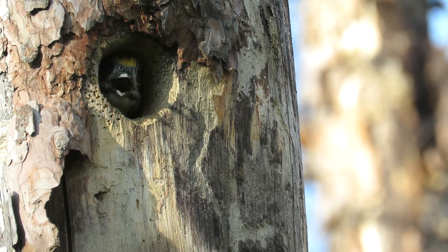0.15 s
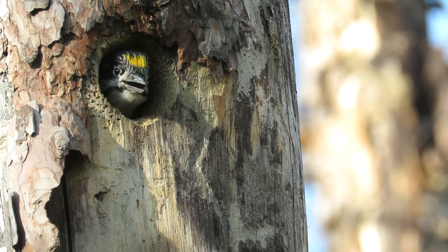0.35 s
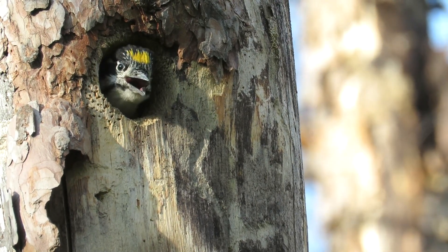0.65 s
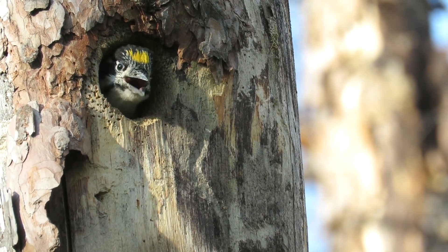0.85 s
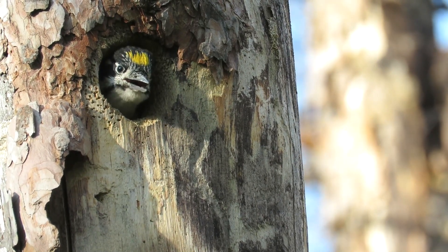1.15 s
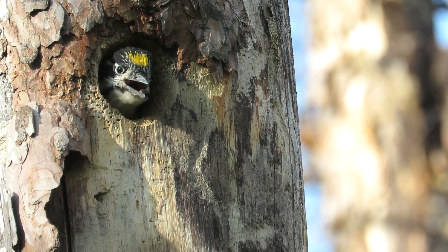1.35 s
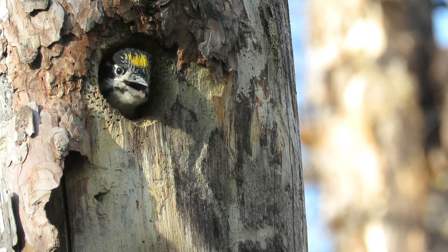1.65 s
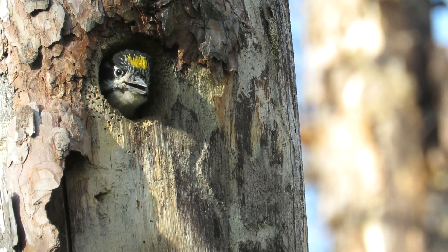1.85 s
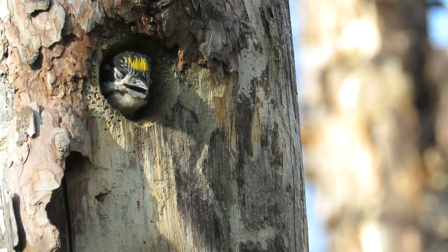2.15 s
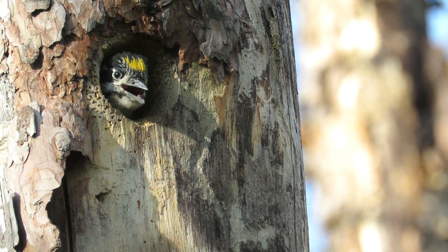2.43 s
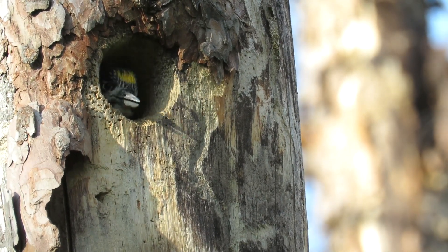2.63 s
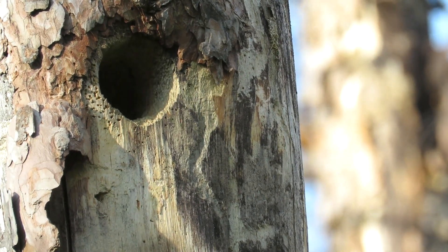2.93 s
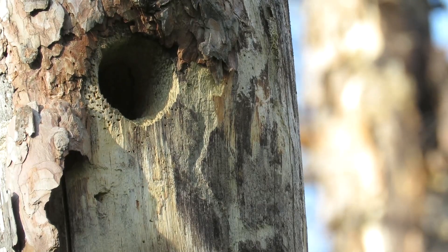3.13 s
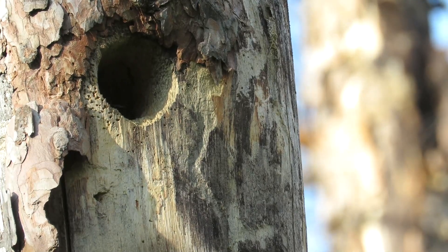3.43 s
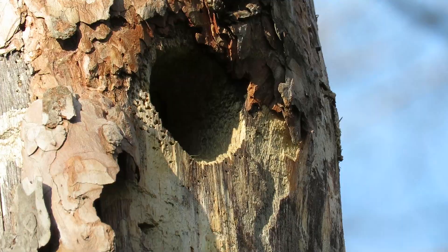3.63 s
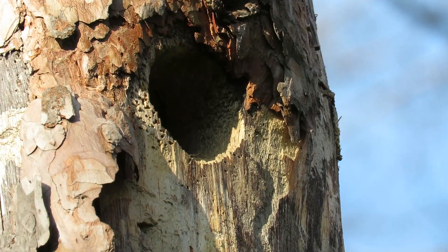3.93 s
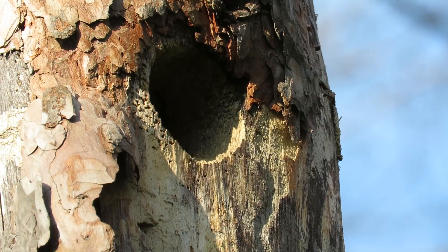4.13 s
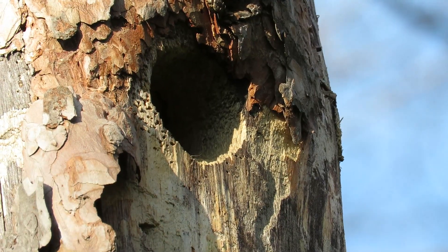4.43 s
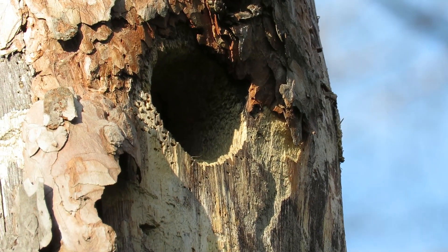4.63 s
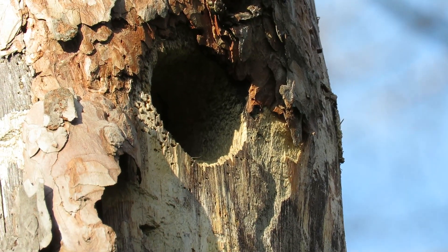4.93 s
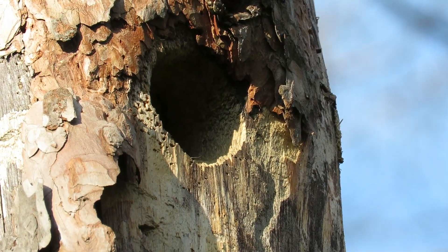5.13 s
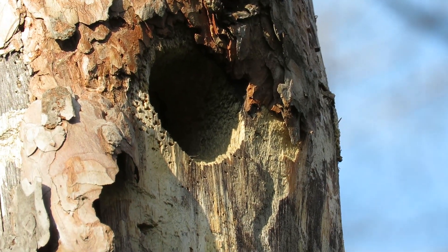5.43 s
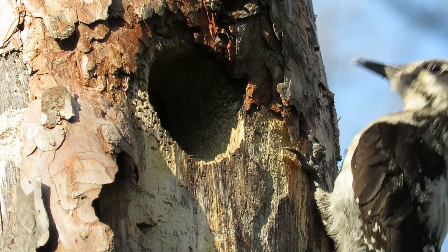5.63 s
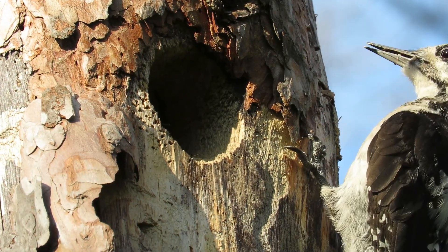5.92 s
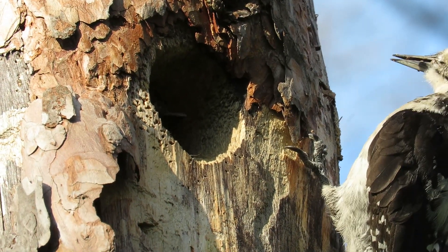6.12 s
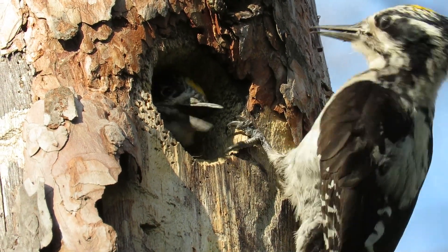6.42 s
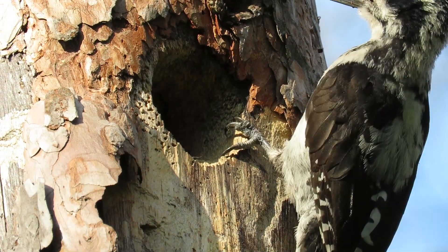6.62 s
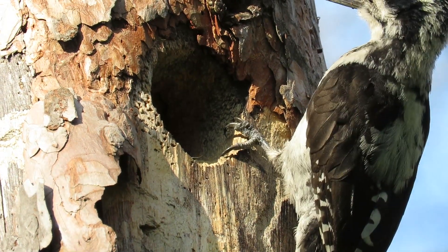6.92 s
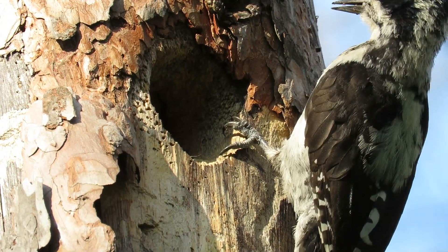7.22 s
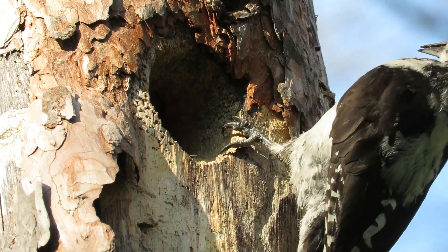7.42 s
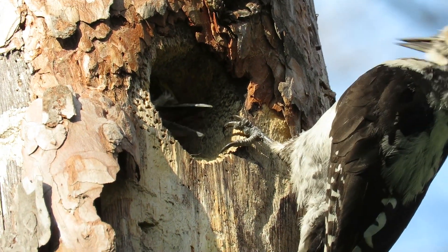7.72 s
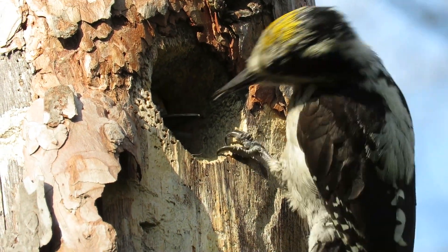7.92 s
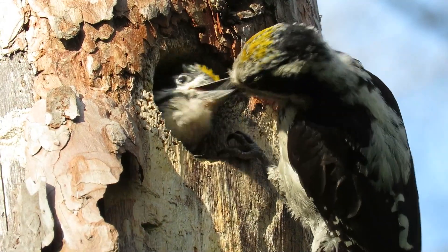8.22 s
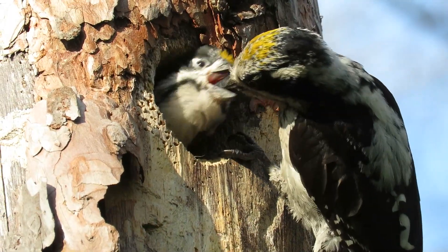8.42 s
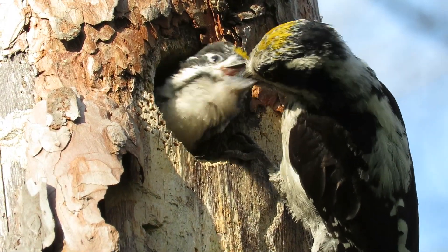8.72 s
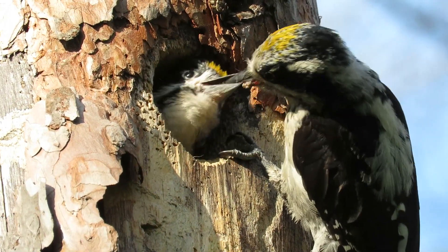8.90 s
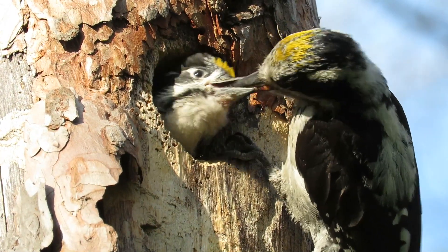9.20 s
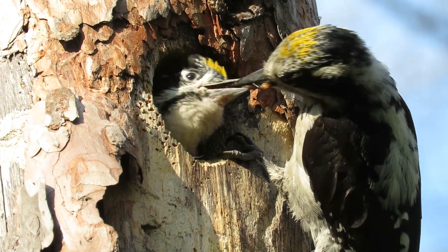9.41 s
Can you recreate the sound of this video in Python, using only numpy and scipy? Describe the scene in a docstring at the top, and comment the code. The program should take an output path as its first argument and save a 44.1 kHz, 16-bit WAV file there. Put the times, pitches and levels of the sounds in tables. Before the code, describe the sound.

Close and central, a woodpecker nestling begs from a tree hole with short, sharp chirps about eight or nine a second. A low breeze rumbles at first. The calls drop softer and hollow as it sinks inside and a distant songbird repeats a falling slur. After a brief gap it cries louder and rougher, with beak clicks and faint sibling squeaks, over quiet forest rush.

```python
"""Woodpecker nestlings begging

Nestlings beg from a hole in a dead tree: one chick calls at the opening, sinks into the cavity, then
cries harder when a parent lands, each cry led by a beak snap. A sibling squeaks from deeper inside.
Voices are sums of harmonics and half-pitch lines under moving spectra; far songbirds are gliding sines.
Breeze, forest rush and hiss are filtered noise; delayed and decaying echoes give hollow, trunk and trees."""
import sys
import numpy as np
from scipy import signal
from scipy.fft import rfft, irfft
from scipy.io import wavfile

SR = 44100
rng = np.random.default_rng(int(sys.argv[2]) if len(sys.argv) > 2 else 0)


def transcribe(u):
    """Save the signal u as a 16-bit wav file named by the first command-line argument.

    u: samples, shape (n,) or (channels, n), limited to [-1, 1]; the rate is SR.
    q: integer samples, one column per channel.
    """
    v = np.clip(np.atleast_2d(u).T, -1, 1)
    q = np.round(v * 32767).astype(np.int16)
    wavfile.write(sys.argv[1], SR, q)


N = 421596

# calls of the nearest chick: t/s, length/s, top pitch f/Hz, level/dB
CHICK_CALLS = [(.005, .05, 2337, -25), (0.133, 0.049, 2350, -25.5), (0.26, 0.048, 2330, -26),
               (.383, .043, 2332, -25.5), (.504, 0.041, 2276, -26.5), (.625, 0.044, 2318, -27.5),
               (.744, 0.048, 2328, -29), (0.858, .048, 2310, -28.5), (.979, 0.04, 2350, -28.5),
               (1.094, 0.044, 2323, -27), (1.208, 0.049, 2330, -28), (1.332, 0.039, 2346, -28),
               (1.444, .04, 2310, -27), (1.562, .039, 2302, -28), (1.675, 0.038, 2300, -28),
               (1.786, 0.04, 2253, -28.5), (1.901, 0.034, 2246, -27.5), (2.012, 0.035, 2237, -27.5),
               (2.122, .037, 2255, -28.5), (2.233, 0.032, 2318, -27.5), (2.342, 0.04, 2335, -27.5),
               (2.452, .03, 2407, -29.5), (2.567, .037, 2350, -27.5), (2.674, 0.029, 2350, -31.5),
               (2.791, 0.034, 2333, -30), (2.899, 0.035, 2395, -29), (3.008, .032, 2556, -27.5),
               (3.108, 0.043, 2506, -29.5), (3.223, 0.029, 2540, -29), (3.329, .04, 2595, -25.5),
               (3.443, .039, 2600, -26), (3.565, 0.043, 2532, -28), (3.708, 0.034, 2330, -32.5),
               (3.824, 0.035, 2280, -34.5), (3.946, 0.035, 2294, -32), (4.061, 0.034, 2240, -33),
               (4.181, 0.034, 2240, -33.5), (4.301, 0.037, 2277, -34), (4.42, 0.035, 2237, -33.5),
               (4.539, 0.035, 2310, -32.5), (4.65, 0.033, 2330, -32), (4.758, .036, 2334, -33.5),
               (4.862, 0.041, 2346, -34.5), (4.971, 0.032, 2343, -31.5), (5.076, 0.032, 2357, -31.5),
               (5.187, .034, 2355, -32), (5.299, 0.033, 2360, -32), (5.414, 0.033, 2306, -33),
               (5.534, 0.038, 2250, -36), (5.858, .053, 2672, -30), (5.969, .048, 2598, -25),
               (6.084, 0.045, 2547, -25), (6.201, .054, 2493, -24.5), (6.326, .048, 2457, -26),
               (6.448, .047, 2455, -25.5), (6.566, .036, 2435, -28.5), (6.689, 0.045, 2240, -39),
               (6.809, 0.045, 2430, -33.5), (6.931, 0.046, 2326, -29.5), (7.057, .045, 2500, -27),
               (7.18, 0.044, 2480, -27.5), (7.305, .045, 2533, -27.5), (7.432, 0.046, 2530, -27),
               (7.564, 0.051, 2498, -28), (7.708, 0.049, 2315, -29.5), (7.847, .047, 2337, -28.5),
               (7.985, .059, 2402, -28.5), (8.145, 0.05, 2478, -28.5), (8.302, .047, 2378, -32),
               (8.5, 0.055, 2287, -29), (8.694, 0.05, 2390, -29), (8.908, .05, 2577, -31),
               (9.102, 0.046, 2480, -28.5), (9.272, .046, 2503, -29), (9.434, 0.052, 2502, -30)]
# effort through a steady begging call: t/(call length), level/dB
STEADY_PUSH = [(0, 0.5), (.08, 2), (.4, 5.5), (.7, 1), (.9, -8), (1.05, -7)]
SINKS_S, PARENT_LANDS_S = 3.65, 5.7


def amp(db):
    """Logarithmic level: 20 dB is a tenfold amplitude."""
    return 10 ** (np.asarray(db) / 20)


def evened(x):
    """Normalisation by power: scales to an rms of 1."""
    return x / np.sqrt(np.mean(x ** 2) + 1e-20)


def read(points, hz):
    """Interpolation of a spectrum on a logarithmic frequency axis."""
    f, value = np.transpose(points)
    return np.interp(np.log(hz + 1), np.log(f + 1), value)


def at(curve, s):
    """Linear interpolation of every column of a control curve at time s."""
    times, *columns = np.transpose(curve)
    return [np.interp(s, times, column) for column in columns]


def add(mix, s, sound):
    """Superposition: lays a sound into the mix at time s."""
    part = mix[max(round(s * SR), 0):][:len(sound)]
    part += sound[:len(part)]


def noise(colour, size):
    """Spectral shaping: white noise weighted by a spectrum, at an rms of 1."""
    spectrum = rfft(rng.standard_normal(size))
    hz = np.fft.rfftfreq(size, 1 / SR)
    return evened(irfft(spectrum * amp(read(colour, hz)), size))


def waver(rate_hz, size):
    """Low-pass filtered noise: smooth random motion, mostly below a given rate."""
    hz = np.fft.rfftfreq(16384, 1 / SR)
    spectrum = rfft(rng.standard_normal(2 * len(hz) - 2))
    return evened(irfft(spectrum / (1 + (hz / rate_hz) ** 4)))[:size]


def forest():
    """Partial coherence: a diffuse rush and hiss differing between the ears, with a thin steady whine."""
    # rush and hiss of the woods: f/Hz, level/dB
    rush_colour = [(15, -20), (60, -1), (130, -4.5), (300, -3), (600, -6.5), (1000, -10), (1500, -16),
                   (2500, -20.5), (4000, -23), (7000, -28.5), (15000, -32.5), (16000, -21.5)]
    # strength of the rush: t/s, level/dB
    rush_db = [(0, -40.5), (3.6, -41.5), (3.8, -42.5), (5.7, -43), (8, -42.5), (9.5, -41.5)]
    # left-right likeness: f/Hz, correlation/1
    likeness = [(30, 1), (120, 1), (300, 0.99), (700, 0.97), (2000, 0.99), (6000, 1), (10000, 0.54),
                (15000, 0.27)]
    whine_hz, whine_db = 15105, -71
    t = np.arange(N) / SR
    a, b = rfft(noise(rush_colour, size=N)), rfft(noise(rush_colour, size=N))
    same = np.clip(read(likeness, np.fft.rfftfreq(N, 1 / SR)), -1, 1)
    mid = irfft(a * np.sqrt((1 + same) / 2), N)
    side = irfft(b * np.sqrt((1 - same) / 2), N)
    whine = amp(whine_db) * evened(np.sin(2 * np.pi * whine_hz * t))
    level = amp(np.interp(t, *np.transpose(rush_db)))
    return level * np.array([mid + side, mid - side]) + whine


def wind():
    """Turbulent pressure on the microphone: low noise in random gusts, gone after 3.71 s."""
    # strength of the breeze before gusts and gain: t/s, level/dB
    breeze_db = [(0.0, -44), (0.42, -50.5), (0.52, -36), (0.96, -45.5), (1.1, -32), (2.32, -30.5),
                 (2.47, -41), (3.54, -36.5), (3.67, -42), (3.7, -54)]
    # spectrum of the turbulence: f/Hz, level/dB
    breeze_colour = [(10, -7.5), (32, -4.5), (60, -5.5), (95, -14), (150, -22.5), (300, -42), (900, -64)]
    gusts_hz, gusts_db, gain_db = 4.7, 1, 0.5
    t = np.arange(N) / SR
    spectrum = rfft(rng.standard_normal(N))
    gusts = evened(irfft(spectrum / (1 + (np.fft.rfftfreq(N, 1 / SR) / gusts_hz) ** 4), N))
    db = at(breeze_db, t)[0] + gain_db + gusts_db * gusts
    fade = np.interp(t, [3.66, 3.71], [1, 0])
    return noise(breeze_colour, size=N) * amp(db) * fade


def hiss():
    """Turbulent flow noise: air rushes through the chick's throat as each call is about to catch."""
    # hiss of begging, then of the cries for food: f/Hz, level/dB
    chatter_colour = [(800, -35), (1800, -11), (2500, -1), (3800, -9), (5000, -3), (6000, -15), (7200, -24),
                      (15000, -30)]
    cry_colour = [(800, -22), (2000, 0), (3300, 0), (4800, -8), (5500, -3), (6100, 6), (6900, -21),
                  (9000, -21), (15000, -15)]
    hiss_s, below_call_db = 0.014, -15
    out, swell = np.zeros(N), signal.windows.tukey(int(hiss_s * SR), .5)
    for s, _, _, db in CHICK_CALLS:
        colour = chatter_colour if s < PARENT_LANDS_S else cry_colour
        air = swell * noise(colour, size=4096)[:len(swell)]
        add(out, s - 0.54 * hiss_s, amp(db + below_call_db) * air)
    return out


def cry(length, top_hz, rise, crest, colour, push, tilt=0, beak_hz=6000, beak_db=0, hoarse_db=-40, bite_db=0):
    """Source and filter: the syrinx tightens, holds, then slackens roughly; throat and beak colour it."""
    # strength of the lines between the harmonics: f/Hz, level/dB
    half_lines = [(1200, -5.5), (3500, -0.5), (5900, 5), (8300, 4.5), (14000, -4)]
    # the treble blooms just after the onset and dulls again as the call slackens
    bloom_s, onset_dull_db_per_octave, slack_dull_db_per_octave = 0.0028, 3.5, 2.5
    # a brief ring of the throat as the call starts
    bite_hz, bite_width_hz, bite_at_s, bite_s = 6100, 380, 0.0017, .002
    overtone_spread_db = 0.85  # no two calls have quite the same balance of overtones
    t = np.arange(int(1.07 * length * SR)) / SR
    u, crest = t / length, np.clip(crest, .03, .8)

    opening = rise * np.maximum(1 - u / crest, 0) ** 2
    closing = .48 * np.maximum((u - crest) / (1 - crest), 0) ** 2.6
    arch = 1 - opening - closing
    scoop = 1 - 0.344 * np.exp(-t / 0.00105)  # the pitch snaps up as the membranes close
    # the voice is unsteady as it starts and as it lets go
    slack = np.minimum(u, 1) ** 10 + np.exp(-t / .0018)
    jitter = (.003 + .014 * slack) * waver(1100, len(t)) + .005 * waver(70, len(t))
    hz = top_hz * np.maximum(arch, .5) * scoop * (1 + jitter)
    phase = 2 * np.pi * np.cumsum(hz) / SR
    k = np.arange(1, 21)[:, None] / 2  # harmonics and the half-pitch lines between them
    f = k * hz

    tilt = tilt - onset_dull_db_per_octave * np.exp(-t / bloom_s) - slack_dull_db_per_octave * u ** 4
    resonance = beak_db * np.exp(-.5 * ((f - beak_hz) / 600) ** 2)
    bite = np.exp(-((t - bite_at_s) / bite_s) ** 2 - .5 * ((f - bite_hz) / bite_width_hz) ** 2)
    db = read(colour, f) + tilt * np.log2(f / 2400) + resonance + bite_db * bite
    # strong and weak cycles alternate in mid-call, adding lines between the harmonics
    halves = hoarse_db + read(half_lines, f) - 50 * (u - .52) ** 2
    flutter = 2.0 * np.array([waver(170, len(t)) for _ in k])
    db = db + (k % 1 > 0) * (halves + .5 * flutter)
    db = db + flutter + overtone_spread_db * rng.standard_normal(k.shape)

    partials = np.sin(k * phase + 2 * np.pi * rng.random(k.shape))
    voice = (amp(db) * (f < SR / 2) * partials).sum(0)
    rasp = noise(colour, size=4096)[:len(t)] * (amp(-25) + amp(-10) * slack)
    edges = np.clip(np.minimum(t / .0017, (t[-1] - t) / .004), 0, 1)
    return (voice + rasp) * amp(np.interp(u, *np.transpose(push))) * edges


def hoarseness(s):
    """Period doubling: base level of the half-pitch lines in a call at time s."""
    # spells of changing hoarseness: start t/s, end t/s, first level/dB, last level/dB
    spells = [(1.5, 2.18, -18, -8), (6.28, 6.99, -21.5, -19), (7, 8.223, -18, -9), (8.42, 8.6, -10, -10)]
    for start, end, first_db, last_db in spells:
        if start <= s < end:
            return np.interp(s, [start, end], [first_db, last_db])
    return -39  # the clear voice


def chick():
    """Radiation from an opening: the nearest voice takes its colour from its place in the hole."""
    # voice with the head in the opening, down in the cavity, straining for food: f/Hz, level/dB
    at_opening = [(1200.0, -3.5), (1900.0, -8.5), (2400.0, -1.5), (3000.0, -1), (4000.0, -1),
                  (4600.0, -4.5), (5200.0, -4), (6200.0, -3.5), (7000.0, -7), (8200.0, -12.5),
                  (9500.0, -15.5), (10800.0, -12.5), (12000.0, -22.5), (15000.0, -28)]
    in_cavity = [(1200, -21), (1900, -1.5), (2350, -3.5), (2900, 1), (3500, 2), (4000, 7.5), (4550, -7),
                 (5200, -5.5), (6200, 2), (7000, -12.5), (8000, -8.5), (9300, -31), (10800, -22),
                 (15000, -29)]
    straining = [(1200.0, 5), (1900.0, 7.5), (2400.0, 1), (3000.0, 8.5), (4000.0, 7.5), (4600.0, 0.5),
                 (5200.0, 5), (6200.0, 8), (7000.0, -1.5), (8200.0, 5), (9500.0, 0), (10800.0, -3),
                 (12000.0, -8), (15000.0, -12.5)]
    # effort through a cry for food: t/(call length), level/dB
    hard_push = [(0, -7.5), (.07, -3), (.15, -1), (.42, 3), (.7, -1), (.9, -6), (1.05, -15)]
    # pitch arch: t/s, opening rise/(share of pitch), place of the crest/(share of call length)
    pitch_arch = [(0, 0.078, 0.42), (2.55, 0.026, 0.41), (2.9, 0.23, 0.34), (3.45, 0.15, .33),
                  (3.7, .34, 0.35), (5.55, 0.31, .37), (5.85, .12, .58), (6.55, 0.116, .6),
                  (6.8, 0.33, 0.33), (7.5, 0.3, 0.39), (7.8, 0.095, .44), (8.3, 0.197, .53),
                  (8.7, 0.12, 0.56), (8.9, 0.15, 0), (9.1, 0.2, 0.57)]
    # brightness of the voice: t/s, slope/(dB per octave)
    brightness = [(0, -1), (.75, 3), (1.45, 2.5), (2.35, 0.7), (2.8, -0.7), (3.44, -2), (3.57, -1),
                  (3.7, -4.5), (5.55, -3), (5.86, -5), (6.55, 0.74), (6.85, -2), (7.45, -0.7), (7.7, -1.8),
                  (8.05, -0.5), (8.3, -2.5), (8.7, -1.3), (8.9, -6), (9.1, -1), (9.3, -3)]
    # resonance of the throat and open beak: t/s, f/Hz, height/dB
    beak = [(.2, 8440, 12), (.4, 6860, 2.5), (1.1, 4150, -2), (2, 4060, 4), (2.12, 6790, 3.5),
            (2.5, 6850, 0), (2.85, 6200, 8.5), (3.25, 6300, 3), (3.44, 8140, 5.5), (3.57, 3320, 1),
            (5.55, 3920, 0), (5.86, 5690, 15), (5.97, 5630, 8.5), (6.4, 6930, 6), (6.57, 5770, 10),
            (6.69, 7130, 11.5), (6.81, 7460, 6), (7.1, 7300, -1.5), (7.7, 6900, 4), (7.98, 5850, 6.5),
            (8.14, 6700, 7.5), (8.3, 6000, 14), (8.5, 6260, 13), (8.7, 5250, 9), (8.9, 6330, 25.5),
            (9.1, 5650, 9.5), (9.27, 4950, 5)]
    out = np.zeros(N)
    for s, length, hz, db in CHICK_CALLS:
        colour = at_opening if s < SINKS_S else in_cavity if s < PARENT_LANDS_S else straining
        push, bite_db = (STEADY_PUSH, 0.5) if s < PARENT_LANDS_S else (hard_push, 4.5)
        rise, crest = at(pitch_arch, s)
        [tilt] = at(brightness, s)
        beak_hz, beak_db = at(beak, s)
        call = cry(length, hz, rise, crest, colour, push, tilt, beak_hz, beak_db, hoarseness(s), bite_db)
        add(out, s, amp(db) * call)
    return out


def cavity(x):
    """Early reflection: the wooden hollow throws back a few close echoes."""
    # echoes inside the hollow: delay t/s, level/dB
    walls = [(.0013, -28), (.0029, -19), (.0047, -8), (.0071, -8)]
    # how much of the voice comes by way of the hollow: t/s, level/dB
    depth = [(0, -7), (2.5, -12), (3.2, -6.5), (5.85, -7.5), (6.6, -7.5), (9.5, -4)]
    inward = x * amp(np.interp(np.arange(N) / SR, *np.transpose(depth)))
    out = np.zeros(N)
    for delay, db in walls:
        add(out, delay, amp(db) * inward)
    return out


def trunk(x, t60=.1):
    """Diffuse scattering: a short ring off the bark and branches round the hole."""
    t = np.arange(4096) / SR
    ring = rng.standard_normal(len(t)) * amp(-60 * t / t60) * (t > .002)
    return signal.oaconvolve(x, ring / np.linalg.norm(ring))[:N]


def trees(x, delay_s=0.016, linger=0.7):
    """Reverberation: sparse echoes from trunks, each band decaying at its own speed."""
    # decay by 60 dB, before the linger factor: f/Hz, t/s
    decay_s = [(1000, 0.12), (2400, 0.65), (4800, 0.43), (7000, 0.74), (10000, 0.38), (15000, 0.091)]
    # spectrum of the echoes: f/Hz, level/dB
    echo_colour = [(1000, 0), (2400, 0), (3500, 2), (4800, 13.5), (6100, -5.5), (7300, 4.5), (9000, -4.5),
                   (15000, -9)]
    sparse = rng.standard_normal(SR) * (rng.random(SR) < 2500 / SR)  # about 2500 echoes a second
    taps = sparse * (np.arange(SR) > delay_s * SR)
    hz, t, z = signal.stft(taps, SR, nperseg=256)
    decay_db = -60 * t / (linger * read(decay_s, hz)[:, None])
    z = z * amp(read(echo_colour, hz)[:, None] + decay_db)
    tail = signal.istft(z, SR, nperseg=256)[1]
    return signal.oaconvolve(x, tail / np.linalg.norm(tail))[:N]


def songbird():
    """Frequency modulation: notes hold, then glide, and wide slurs are buzzier from random pitch jitter."""
    # stray notes: t/s, length/s, first f/Hz, last f/Hz, level/dB
    stray_notes = [(.958, 0.029, 3490, 2980, -56), (1.495, 0.041, 3480, 2700, -49),
                   (2.139, 0.041, 3760, 3990, -41.5), (2.437, 0.062, 3750, 3850, -43.5),
                   (2.746, 0.031, 3765, 3800, -45.5)]
    # one song: the same falling slur six times at an even beat, loudest in the middle
    start_s, beat_s, slur_s, slur_first_hz, slur_last_hz = 3.688, .1975, 0.18, 5860, 2540
    crest_s, crest_db, fade_db_per_s = 4.28, -43, 8
    out = np.zeros(N)
    slurs = [(s, slur_s, slur_first_hz, slur_last_hz, crest_db - fade_db_per_s * abs(s - crest_s))
             for s in start_s + beat_s * np.arange(6)]
    for s, length, first_hz, last_hz, db in stray_notes + slurs:
        u = np.linspace(0, 1, int(length * SR))
        hz = first_hz * (last_hz / first_hz) ** np.interp(u, [0, .27, 1], [0, 0, 1])
        buzz = .006 + .033 * abs(np.log2(first_hz / last_hz))
        hz = hz * (1 + buzz * waver(450, len(u)))
        note = np.sin(2 * np.pi * np.cumsum(hz) / SR)
        add(out, s, amp(db) * note * signal.windows.tukey(len(u), .2))
    return out


def ticks():
    """Impulsive excitation: a dry decaying snap as the beak opens just before each cry for food."""
    # strength of the snap: t/s, level/dB
    snap_db = [(5.9, -44), (6.45, -26.5), (6.7, -35), (7.3, -37), (7.9, -25.5), (8.6, -31), (9.4, -33)]
    # spectrum of the snap: f/Hz, level/dB
    snap_colour = [(300, -12), (1000, 16), (3200, 8), (4600, 7), (6300, 5.5), (8000, -15), (15000, -24)]
    lead_s, decay_s = .0155, .0028
    out, t = np.zeros(N), np.arange(1024) / SR
    for s, *_ in CHICK_CALLS:
        if s > PARENT_LANDS_S:
            snap = noise(snap_colour, size=len(t)) * np.exp(-t / decay_s)
            add(out, s - lead_s, amp(at(snap_db, s)) * snap)
    return out


def sibling():
    """Muffling by the hollow: short squeaks from the bottom of the nest, slowly sinking in pitch."""
    # squeaks: t/s, level/dB
    squeaks = [(5.983, -41), (6.025, -38), (6.219, -36), (6.276, -39.5), (6.529, -40), (6.595, -36),
               (6.785, -45), (6.888, -44.5), (7.139, -42.5), (7.269, -43), (7.376, -45), (7.686, -48),
               (7.793, -45.5), (7.906, -48)]
    # muffled voice: f/Hz, level/dB
    muffled = [(1000, -8), (1600, 6), (2100, -3.5), (3000, 3), (4000, -7), (5000, -14), (6100, -10),
               (7500, -17), (12000, -28)]
    length_s, first_hz, sag_hz_per_s = .028, 2050, 82
    out = np.zeros(N)
    for s, db in squeaks:
        hz = first_hz - sag_hz_per_s * (s - squeaks[0][0])
        squeak = cry(length_s, hz, rise=0.089, crest=0.243, colour=muffled, push=STEADY_PUSH)
        add(out, s, amp(db) * squeak)
    return out


def scene():
    """Direct and reflected sound: the nest straight ahead, the forest all round."""
    voices = chick() + hiss() + sibling() + ticks()
    nest = voices + cavity(voices) + amp(-17) * trunk(voices)
    song = songbird()
    far = amp(-11) * song + amp(3) * trunk(song) + amp(-4) * trees(song, delay_s=0.023, linger=1.7)
    echoes = amp(-21.5) * trees(nest)
    # echoes of opposite sign in the two channels
    width = amp(-42) * trees(nest + far) * np.array([[1], [-1]])
    return nest + echoes + far + width + wind() + forest()


def record(dry):
    """Band limitation: the recorder passes what lies below its upper edge."""
    edge_hz = 15900
    lowpass = signal.firwin(255, edge_hz, window=("kaiser", 9), fs=SR)
    return signal.oaconvolve(dry, lowpass[None], "same")


dry = scene()
out = record(dry)
transcribe(out)
```